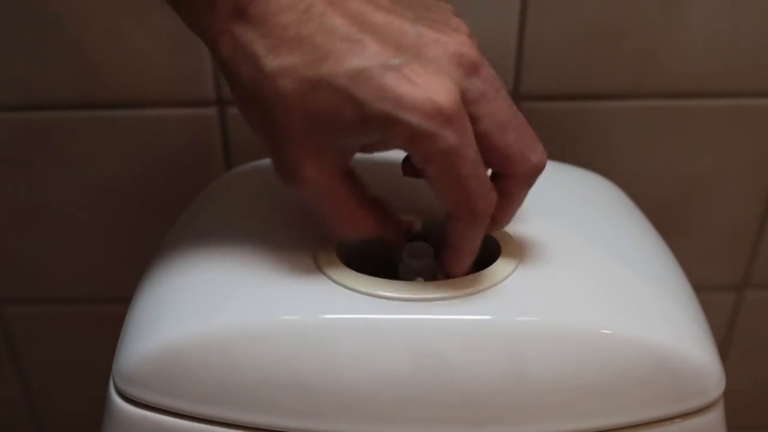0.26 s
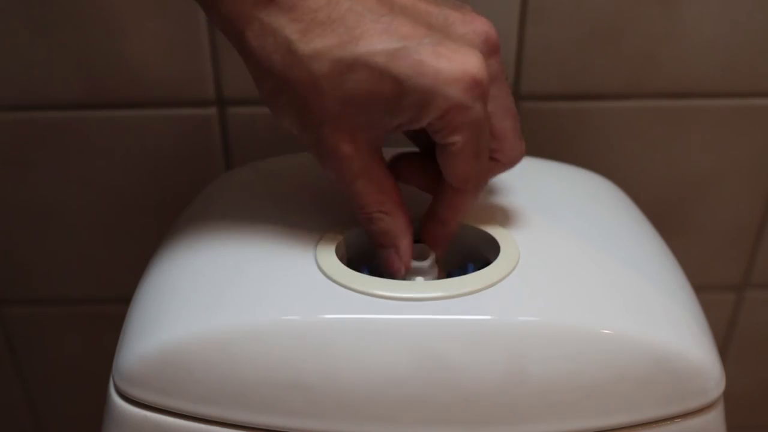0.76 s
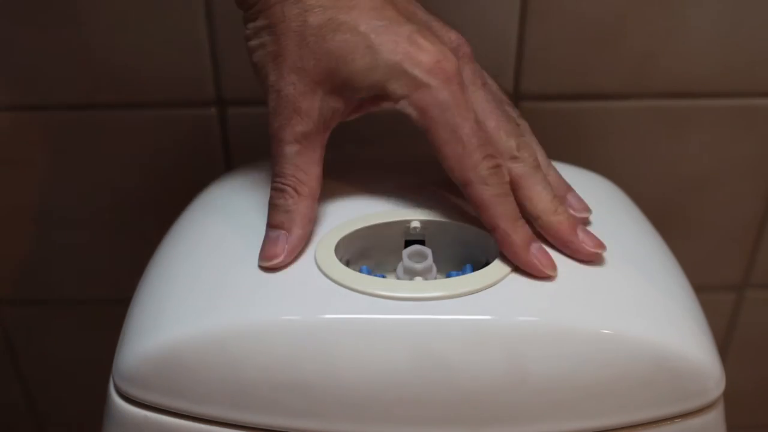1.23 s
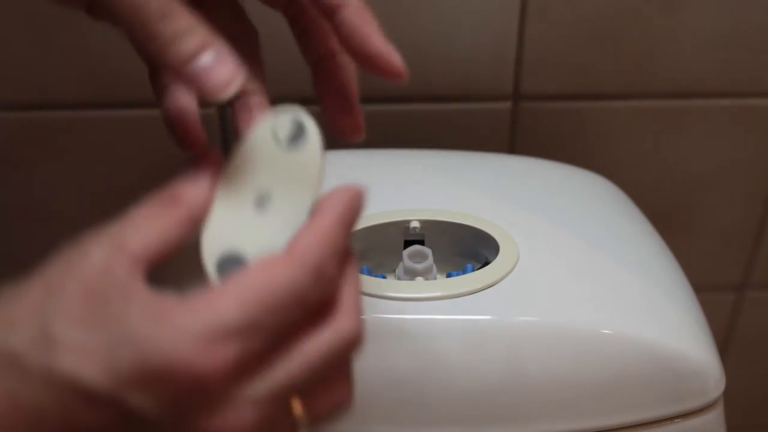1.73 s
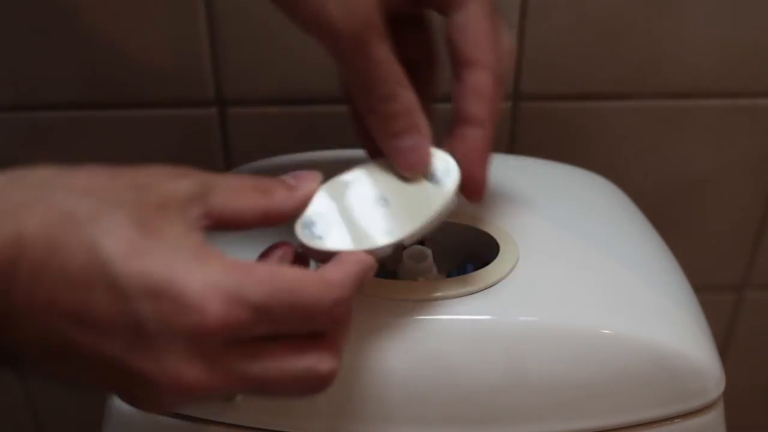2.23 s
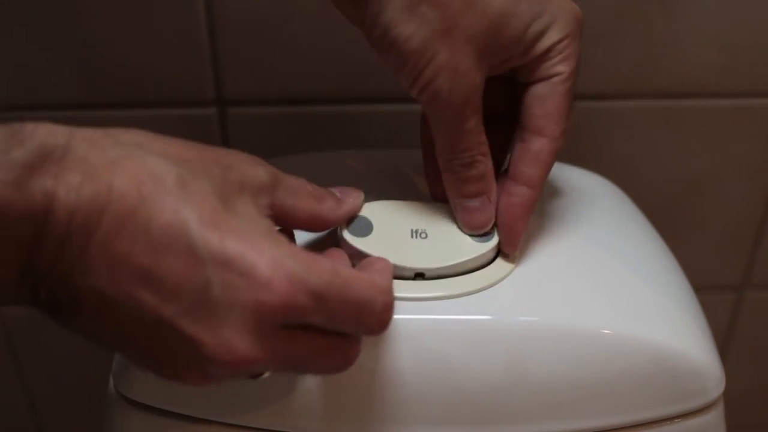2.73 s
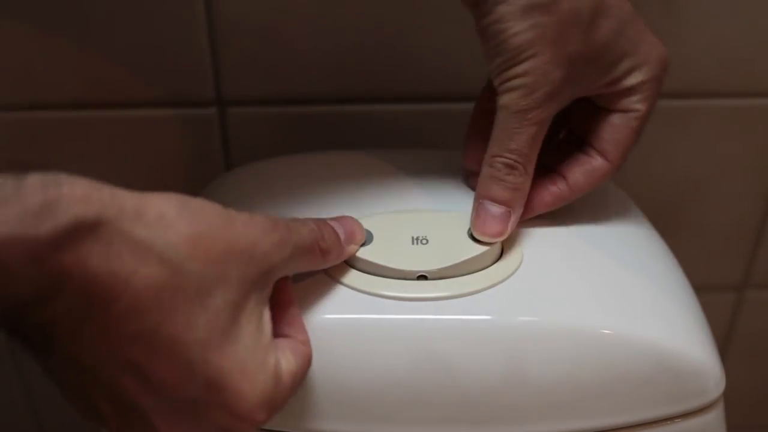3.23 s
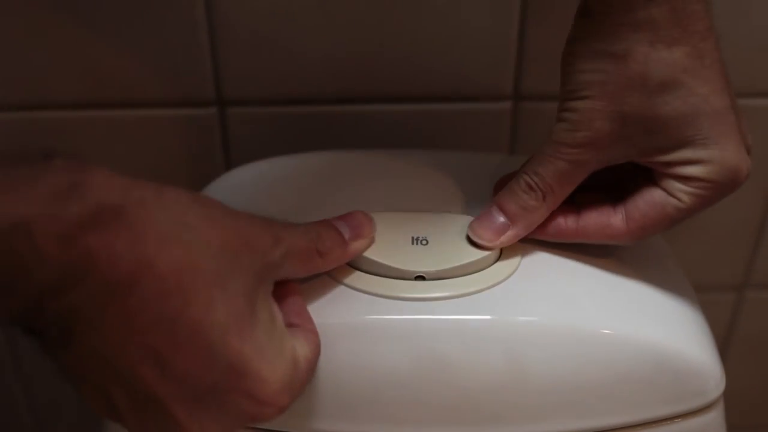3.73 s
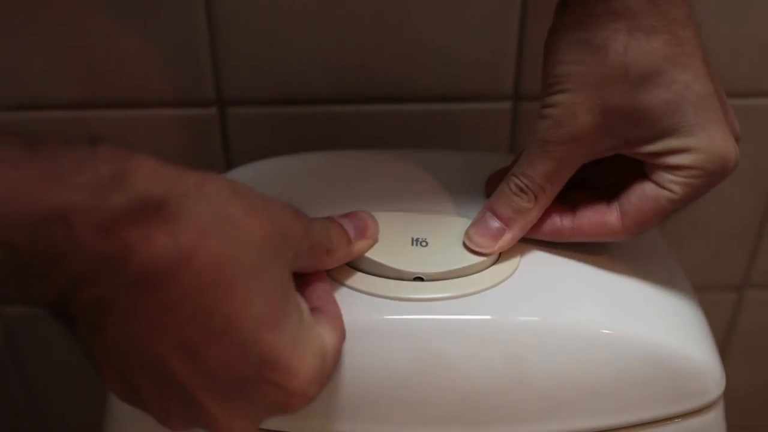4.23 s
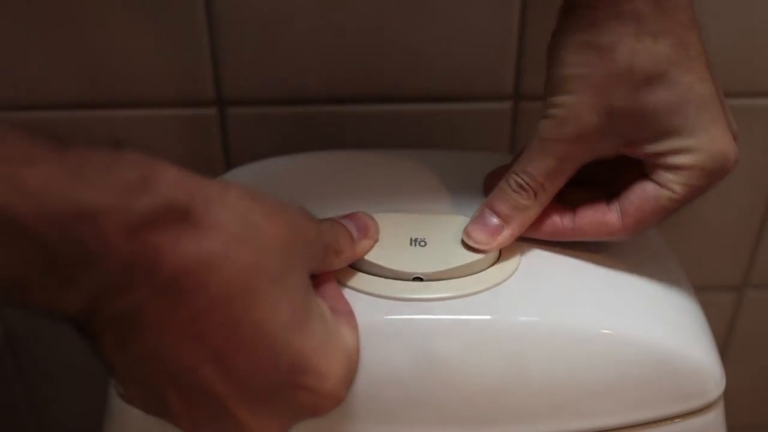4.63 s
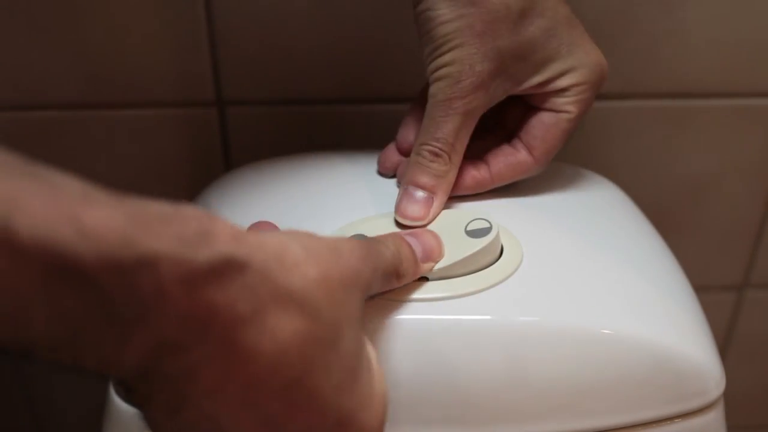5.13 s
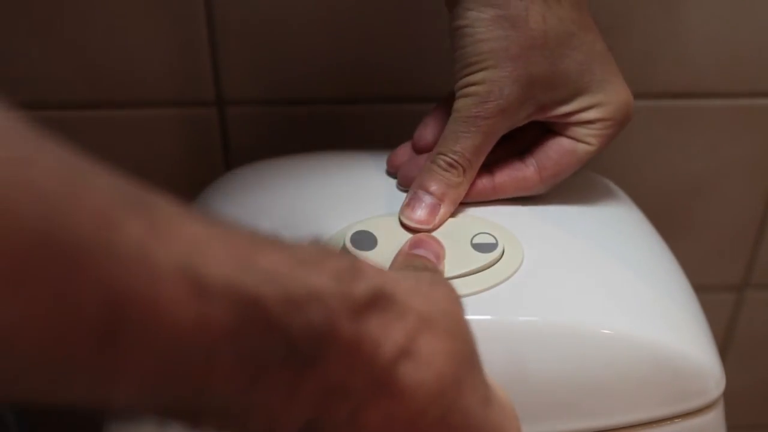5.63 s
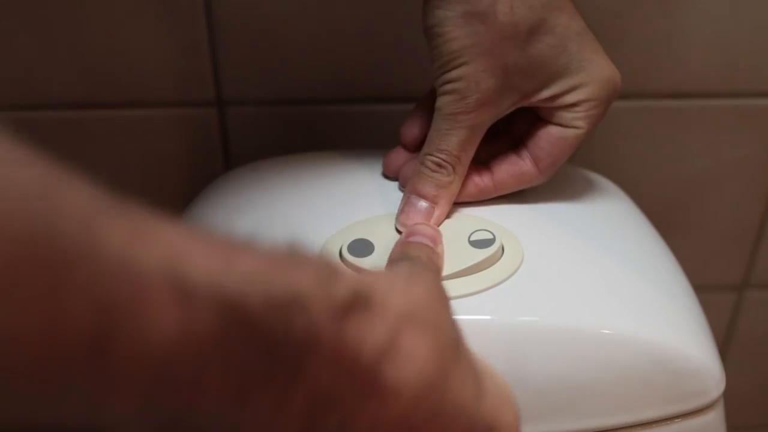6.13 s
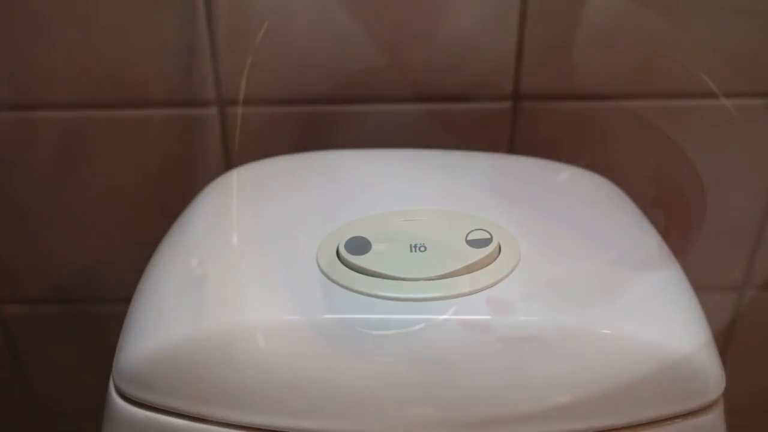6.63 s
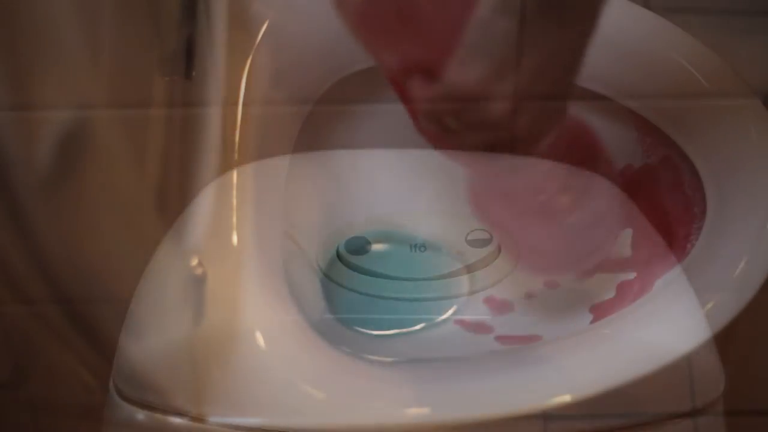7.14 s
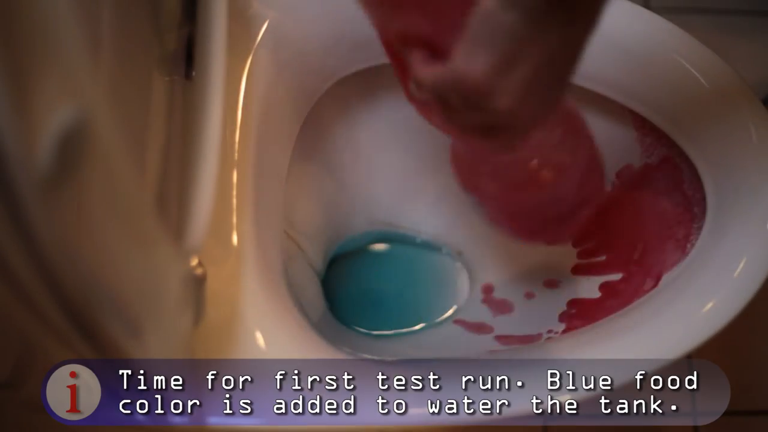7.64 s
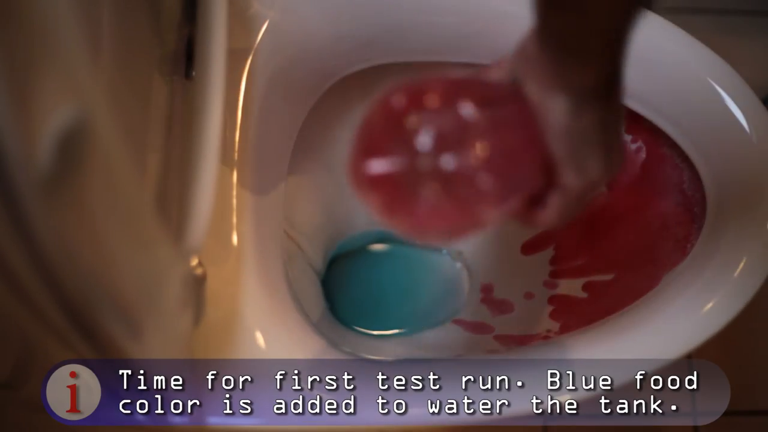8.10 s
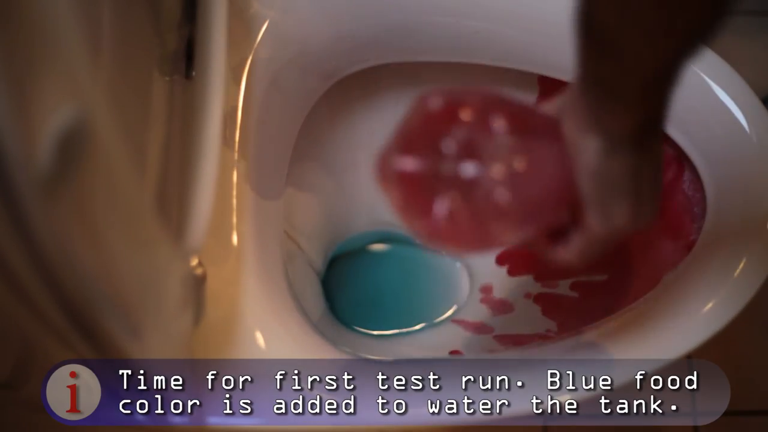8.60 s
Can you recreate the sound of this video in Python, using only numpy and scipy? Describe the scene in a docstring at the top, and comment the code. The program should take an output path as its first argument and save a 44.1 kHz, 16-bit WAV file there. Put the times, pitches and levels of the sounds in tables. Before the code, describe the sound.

A small plastic nut scrapes and slips on its thread over faint valve hiss, then a push button snaps in with two very loud clicks.

```python
"""A small plastic nut slips and scrapes on its thread inside a cistern lid, over a faint valve hiss, bright at first.
Fingers tick on plastic, a push button is set into the opening and its two catches snap home, loud enough
to clip the microphone; at the end a bottle knocks on the bowl. Hiss is noise through pipe resonances; ticks,
slips and knocks are short noise bursts ringing damped modes; snaps are coloured cracks with a ringing lid.
A small tiled bathroom answers every contact with a decaying noise tail."""
import sys
import numpy as np
from scipy import signal
from scipy.io import wavfile
from scipy.ndimage import uniform_filter1d

SR = 44100
rng = np.random.default_rng(int(sys.argv[2]) if len(sys.argv) > 2 else 0)


def ratio_of_db(decibels):
    """Turn decibels (scalar or array-like) into linear amplitude factors; 0 dB maps to 1."""
    return 10 ** (np.asarray(decibels, float) / 20)


def output_pcm(signal):
    """Save a mono or channel-first signal as 16-bit PCM at the path in sys.argv[1].

    Samples are clipped to [-1, 1] before scaling.
    """
    pcm = np.clip(np.atleast_2d(signal).T, -1, 1) * 32767
    wavfile.write(sys.argv[1], SR, np.round(pcm).astype(np.int16))


N = 390983  # samples
CONTACT_MS = 0.03  # a knock is one brief contact


def peaked(x):
    """Scales a sound to a peak of 1."""
    return x / abs(x).max()


def read(points, hz):
    """Reads a (frequency, value) table along a logarithmic frequency axis."""
    f, value = np.transpose(points)
    return np.interp(np.log(hz + 1), np.log(f + 1), value)


def add(mix, s, sound):
    """Lays a sound into the mix at s seconds."""
    part = mix[round(s * SR):][:len(sound)]
    part += sound[:len(part)]


def band(x, low_hz, high_hz):
    """Keeps what lies between two frequencies."""
    edges_hz = [low_hz, min(high_hz, SR / 2.1)]
    return signal.sosfilt(signal.butter(3, edges_hz, "band", fs=SR, output="sos"), x)


def without_top_treble(x):
    """Steep low-pass near 13 kHz: next to nothing remains in the top treble."""
    return signal.sosfilt(signal.ellip(8, 1, 70, 13000, fs=SR, output="sos"), x)


def ring(hz, db, t60):
    """One mode, a sine dying by 60 dB in t60 seconds, cut at a quarter second."""
    t = np.arange(SR // 4) / SR
    return ratio_of_db(db - 60 * t / t60) * np.sin(2 * np.pi * hz * t)


def ringing(modes):
    """All modes of one body sounding together."""
    return sum(ring(*mode) for mode in modes)


def tilted(modes, db_per_octave):
    """Harder contacts favour the upper modes, softer ones the lower."""
    middle = np.mean([np.log2(hz) for hz, db, t60 in modes])
    return [(hz, db + db_per_octave * (np.log2(hz) - middle), t60) for hz, db, t60 in modes]


def rattle(ms):
    """A contact is a short, dense noise burst that starts at once and dies fast."""
    t = np.arange(SR // 40) / SR
    decay = np.exp(-(1000 * t / ms) ** 1.1)
    return peaked(rng.standard_normal(len(t)) * decay)


def struck(modes, ms, crack_db, low_hz, high_hz):
    """The burst rings the modes and is also heard directly as a crack."""
    burst = rattle(ms)
    sound = peaked(signal.fftconvolve(burst, ringing(modes)))
    crack = peaked(band(burst, low_hz, high_hz))
    add(sound, 0, ratio_of_db(crack_db) * crack)
    return sound


def room(x, wet_db):
    """Dense reflections off the tiles, each band dying at its own speed."""
    # decay off the tiles: (frequency [Hz], t60 [s])
    tiles = [(100, 0.48), (260, 0.11), (700, 0.23), (1840, 0.22), (4850, 0.23), (12800, 0.14)]
    # slower second tail: (frequency [Hz], starting level [dB])
    late = [(100, -23), (400, -19.5), (900, -14), (2000, -22.5), (6000, -33), (12000, -26.5)]
    late_t60 = 0.53  # s
    taps = rng.standard_normal(SR)
    hz, t, z = signal.stft(taps, SR, nperseg=256)
    decay = ratio_of_db(-60 * t / read(tiles, hz)[:, None])
    # the hollow cistern and the hall beyond linger
    decay += ratio_of_db(read(late, hz)[:, None] - 60 * t / late_t60)
    tail = signal.istft(z * decay, SR, nperseg=256)[1]
    tail *= np.clip(np.arange(len(tail)) / SR / 0.0002, 0, 1)  # swells in over 0.2 ms
    return x + ratio_of_db(wet_db) * signal.oaconvolve(x, tail / np.linalg.norm(tail))[:N]


def hiss():
    """Valve in the cistern: steady noise through pipe resonances, with faint drifting patches."""
    # bright at first, opening uncovered, opening covered, at the bowl: (start [s], fade-in [s], top [Hz])
    parts = [(-1, .001, 15300), (1.456, .002, 13600), (2.5, .25, 13600), (6.96, .003, 13600)]
    # relative noise spectrum of each part: (frequency [Hz], density [dB per Hz])
    spectra = [
        [(24, -69), (40, -40), (273, -17), (359, -9), (496, -17), (548, -6.5), (926, -14.5), (2110, -9),
         (2270, -15), (3140, -7), (3380, -15), (3930, -3.5), (4800, -8.5), (8100, -4.5), (15500, -4)],
        [(12, -64), (20, -35), (193, -3), (275, -4.5), (315, -16), (361, -8), (714, -8.5), (796, -10.5),
         (1340, -5.5), (1710, -7.5), (2500, -7), (6330, -4), (13600, -24.5)],
        [(12, -57), (20, -33.5), (143, -2.5), (414, -4), (658, -1), (754, -4.5), (1370, -2.5), (1620, -4.5),
         (2790, -1.5), (4090, -5.5), (6330, -1), (9280, -5), (13600, -25.5)],
        [(12, -58), (20, -48), (112, -12.5), (253, -14), (324, -15), (437, -12.5), (623, -7.5), (888, -13),
         (1170, -7.5), (2870, -8.5), (4320, -10), (7670, -9.5), (13600, -34)],
    ]
    # pipe resonances of each part, negative ones dips: (frequency [Hz], width [Hz], height [dB])
    pipes = [
        [(546, 18, 10), (790, 28, 5), (2160, 18, 15), (3264, 40, 13), (3973, 42, 12), (4340, 500, -3.5),
         (6360, 320, -11), (7060, 45, 12), (7760, 40, 6), (8235, 60, 8), (10000, 35, 8), (11000, 100, -2),
         (12450, 65, 10), (14300, 52, 6)],
        [(1087, 19, 9.7), (1325, 53, 12.4), (2000, 20, 12), (2463, 20, 16), (2930, 220, 8.5), (3210, 39, 12),
         (4160, 36, 10.6), (4800, 50, 7.7), (6050, 68, 1.9), (6370, 81, 6), (7400, 280, 6.6), (9060, 2900, 6.1)],
        [(120.3, 15, 7.2), (1398, 80, 5.6), (1918, 42, 6.8), (2364, 31, 5.2), (2745, 50, 6.6), (2995, 30, 6.1),
         (3146, 46.7, 8.2), (3390, 31, 10.5), (4560, 240, 4.4), (5930, 60, 2.5), (6770, 68, 0.93)],
        [(295, 13.5, 17), (675, 20, 5.3), (760, 55, 9.8), (1126, 11, 15), (1955, 27, 9.4), (2420, 16, 1.9),
         (2840, 59, 7.9), (3000, 17, 3.7), (3280, 26, 6.9), (3750, 10, 1.7)],
    ]
    # higher while the opening is uncovered: (time [s], level [dB])
    levels = [(0, -47.5), (1.45, -47.5), (1.46, -46), (2.4, -45.5), (2.7, -49), (5.3, -49.5), (5.7, -51.5),
              (6.3, -49), (8.87, -50)]
    frames = N // 1024 + 5
    hz, t = np.fft.rfftfreq(4096, 1 / SR), np.arange(N) / SR
    out = np.zeros(N)
    for (start, fade, top_hz), spectrum, resonances in zip(parts, spectra, pipes):
        real, imaginary, patches = rng.standard_normal((frames, 2049, 3)).T
        patches = uniform_filter1d(uniform_filter1d(patches, 30, 0), 4, 1)
        patches_db = 1.63 * patches / patches.std()
        db = read(spectrum, hz)
        db = db + sum(height / (1 + (2 * (hz - f) / width) ** 2) for f, width, height in resonances)
        db -= 60 * (hz > top_hz)
        bins = (real + 1j * imaginary) * ratio_of_db(db[:, None] + patches_db)
        noise = signal.istft(bins, nperseg=4096, noverlap=3072)[1][:N]
        # each part fades in over the one before at equal power
        angle = np.pi / 2 * np.clip((t - start) / fade, 0, 1)
        out = np.cos(angle) * out + np.sin(angle) * noise / noise.std()
    return out * ratio_of_db(np.interp(t, *np.transpose(levels)))


def rubbing():
    """Thumbs rub on the button: dense soft grains in a narrow treble band."""
    # (start [s], length [s], loudest grain level [dB])
    rubs = [(3.15, 0.38, -41.5), (4.68, .3, -45.5), (5.03, 0.22, -42.5), (6.5, 0.44, -45)]
    grains_per_s = 150
    out = np.zeros(N)
    for start, length, db in rubs:
        for s, softness, pitch in rng.random((int(length * grains_per_s), 3)):
            mode = (5700 + 700 * pitch, 0, 0.012)
            grain = struck([mode], 4.1, -8.5, 5400, 9000)
            add(out, start + length * s, ratio_of_db(db - 11 * softness) * grain)
    return without_top_treble(room(out, -7))


def hands():
    """Hands land on the porcelain, each thump four damped modes; a palm slides off as a noise burst."""
    # (time [s], level [dB], lowest mode [Hz], its t60 [s], crack level [dB])
    thumps = [(1.317, -37, 490, 0.033, -22), (1.329, -34.5, 560, 0.022, -9), (2.766, -39, 276, 0.037, -25),
              (2.799, -42, 211, 0.045, -25), (6.386, -45.5, 288, .3, -26), (6.39, -52, 91, 0.18, -25),
              (6.70, -55, 463, 0.25, -20)]
    # the palm slides off the lid: (time [s], level [dB], decay time [ms])
    scrape_s, scrape_db, scrape_ms = 1.329, -33, 12
    out = np.zeros(N)
    for s, db, hz, t60, crack_db in thumps:
        modes = [(hz, 0, t60), (hz * 1.084, -3, t60 * 0.43),
                 (hz * 1.44, -6, t60 * 0.4), (hz * 2.04, -9, t60 * 0.48)]
        thump = struck(modes, CONTACT_MS, crack_db, 930, 7500)
        add(out, s, ratio_of_db(db) * peaked(band(thump, hz * 0.7, 12000)))
    add(out, scrape_s, ratio_of_db(scrape_db) * peaked(band(rattle(scrape_ms), 1100, 10300)))
    return without_top_treble(room(out, -1.6))


def bottle():
    """A soft bottle bumps the bowl; its hard cap clacks, skids and bounces, each on its own modes."""
    # bottle on the bowl: (time [s], level [dB], tilt [dB per octave])
    bumps = [(6.964, -30.5, 5), (7.401, -33, -6), (8.169, -44, -11.5)]
    # modes of the bottle: (frequency [Hz], level [dB], t60 [s])
    body = [(125, -7, 0.042), (165, -2.5, 0.062), (225.7, -1.5, 0.098), (303, -4, 0.2), (445, 0, 0.038),
            (613, -5, 0.044), (790, -21, .04)]
    # cap on the bowl, then its bounce: (time [s], level [dB])
    clacks = [(7.5139, -18), (7.537, -34)]
    # modes of the cap: (frequency [Hz], level [dB], t60 [s])
    cap = [(620, -17, 0.018), (860, -9, 0.021), (1230, -12, .018), (1540, -5, 0.018), (1831, 1, .05),
           (2330, -5, 0.015), (2900, -3, .012), (3600, -8, 0.0088)]
    out = np.zeros(N)
    for s, db, tilt_db in bumps:
        bump = struck(tilted(body, tilt_db), CONTACT_MS, -4.5, 930, 5400)
        add(out, s, ratio_of_db(db) * peaked(band(bump, 115, 12000)))
    for s, db in clacks:
        clack = struck(cap, CONTACT_MS, -6, 3400, 8200)
        add(out, s, ratio_of_db(db) * peaked(band(clack, 440, 13000)))
        skid = peaked(band(rattle(4), 950, 4400))  # the cap skids as it lands
        add(out, s, ratio_of_db(db - 5.5) * skid)
    return without_top_treble(room(out, -1.6))


def seating():
    """The button's edge meets the rim and rings the button's damped modes."""
    # (time [s], level [dB], tilt [dB per octave])
    seatings = [(2.662, -24, -1), (2.748, -18, 0.5)]
    # modes of the button: (frequency [Hz], level [dB], t60 [s])
    button = [(264, -11, .03), (1094, -8.5, 0.029), (2050, -9.5, 0.052), (2360, -4.5, .02),
              (3200, 0, 0.0078), (3800, -4, 0.0075)]
    out = np.zeros(N)
    for s, db, tilt_db in seatings:
        knock = struck(tilted(button, tilt_db), CONTACT_MS, -6.5, 930, 8600)
        add(out, s, ratio_of_db(db) * peaked(band(knock, 150, 12000)))
    return without_top_treble(room(out, -1.6))


def ticks():
    """Plastic under the fingers: two close short modes per clear tick, one per faint random tick."""
    # the clearest ticks: (time [s], level [dB], lower mode [Hz])
    clear = [(1.59, -34.5, 5730), (1.6417, -35.5, 5000), (1.682, -22.5, 5770), (1.9994, -35, 6380),
             (2.2812, -36, 6360), (2.4814, -37, 6900), (2.6614, -25, 6370), (2.7468, -26, 5900),
             (3.242, -33.5, 5780), (3.3743, -37, 6540), (3.553, -32, 5860), (3.9142, -31.5, 5780),
             (4.6964, -31, 8040), (5.135, -35, 6420), (5.621, -34, 8880), (6.2292, -35, 6020),
             (6.558, -37, 5700), (6.579, -30.5, 6400), (6.691, -33.5, 6370), (6.8056, -31, 6580)]
    # one thin broad tick: (time [s], level [dB])
    crackle_s, crackle_db = 7.3123, -34
    out = np.zeros(N)
    for s, db, hz in clear:
        pair = [(hz, 0, 0.012), (hz + 550, -3, 0.007)]
        add(out, s, ratio_of_db(db) * struck(pair, 4.65, -11.5, 4670, 8300))
    add(out, crackle_s, ratio_of_db(crackle_db) * peaked(band(rattle(3.55), 4500, 9600)))
    start_s, span_s = 1.5, 5.4  # while the hands work
    for s, size, pitch in rng.random((340, 3)):
        mode = (5600 + 2600 * pitch ** 2, 0, 0.008)
        faint = struck([mode], 2.4, -3.5, 4900, 11000)
        add(out, start_s + span_s * s, ratio_of_db(-47.5 + 10 * size ** 2) * faint)
    return without_top_treble(band(room(out, -6), 2500, 19000))


def nut():
    """The nut slips on its thread, each slip ringing its modes, among fine random scrapes."""
    # (time [s], level [dB], broad crack [dB], middle modes [dB], burst decay time [ms])
    slips = [(0.0591, -30, -10, -9, 4.5), (0.0813, -24.5, -6, 0, 4.2), (0.1158, -28.5, -22, -7, 3.7),
             (0.183, -26.5, -17, -7, 4.9), (0.2273, -28, -14, -3, 8.1), (0.286, -26.5, -7, 0.5, 10),
             (0.4035, -31, -18, -7, 2.3), (0.4727, -23, 2, 0.5, 3.5), (0.5091, -24, -13, 1, 10),
             (0.564, -23, -2, -1, 2.3), (0.636, -23, 3, 14, 4.2), (0.6633, -30.5, -15, 1, 6),
             (0.7442, -35, -6, 1, 2.6), (0.791, -23, 1, 6, 2.7), (0.8869, -32, -8, 4.5, 4)]
    # modes of the nut: (frequency [Hz], level [dB], t60 [s])
    nut_modes = [(558.5, -0.5, 0.062), (337, -16, 0.015), (3370, -17, 0.018), (4580, 3, 0.0024),
                 (9086, 2.5, 0.015), (9600, -23, .008), (14500, -0.5, 0.012)]
    hollow_db, thin_db = -21, -7.5  # share of the two low modes and of the top mode in every slip
    out = np.zeros(N)
    for s, db, crack_db, mid_db, ms in slips:
        shares_db = [hollow_db, hollow_db, mid_db, mid_db, 0, 0, thin_db]
        modes = [(hz * rng.uniform(0.98, 1.02), d + share, t60)
                 for (hz, d, t60), share in zip(nut_modes, shares_db)]
        add(out, s, ratio_of_db(db) * struck(modes, ms, crack_db, 3230, 13000))
    scrape_modes = [(hz, d - 12 * (hz < 1000), t60) for hz, d, t60 in nut_modes] + [(770, -1.5, 0.014)]
    scrape_span_s = 0.95
    for s, size in rng.random((110, 2)):
        scrape = struck(scrape_modes, 6.6, -2, 1130, 15000)
        add(out, scrape_span_s * s, ratio_of_db(-49.5 + 9.8 * size) * scrape)
    # deep in the opening, little reaches the tiles; two passes steepen the band edges
    return band(band(room(out, -8), 220, 17000), 220, 17000)


def crack_colour(spectrum):
    """Minimum-phase impulse with the given spectrum, so the crack starts at once."""
    hz = np.fft.rfftfreq(4096, 1 / SR)
    gain = np.log(ratio_of_db(np.maximum(read(spectrum, hz), -90)))
    full = np.r_[gain, gain[-2:0:-1]]
    return np.fft.ifft(np.exp(full - 1j * signal.hilbert(full).imag)).real


def snaps():
    """Each catch gives one hard blow that cracks broadly and rings the lid and hollow cistern."""
    # the two catches: (time [s], crack level [dB], lid ring level [dB])
    catches = [(5.42, 6.989, -35), (5.8174, 8.487, -15.5)]
    # relative crack spectrum of each catch: (frequency [Hz], density [dB per Hz])
    colours = [
        [(18, -63), (30, -35), (546, 0), (787, -10.5), (874, -14.5), (1290, -13.5), (2130, -10.5), (3060, -7),
         (3310, -9), (6050, -6.5), (9680, -10.5), (15500, -45.5)],
        [(18, -79), (30, -42.5), (560, -6.5), (1330, -17), (1470, -23.5), (1860, -18.5), (2130, -23.5),
         (2620, -16.5), (3490, -18.5), (4080, -14), (7450, -10.5), (15500, -34.5)],
    ]
    # porcelain lid and button, damped by the pressing thumbs: (frequency [Hz], level [dB], t60 [s])
    lid = [(273, -13, 0.022), (470, -17, 0.068), (520, -20, 0.057), (560, -7.5, 0.049), (652, 10.5, 0.1),
           (763, 2.5, 0.038), (1020, -17, 0.0378), (1398, 9.5, 0.025), (2000, 6.5, 0.033), (3180, 12, .04),
           (4120, 6, 0.026), (4420, 9, .04), (5440, -1.5, 0.033), (5780, 6, .04), (7190, -5.5, .03)]
    # thin lasting ring of the button: (frequency [Hz], level [dB], t60 [s])
    sheen = [(4200, -7, .2), (4800, -4, .2), (5430, 4, .24), (5635, -2, 0.3), (5850, -0.5, .24)]
    # hollow porcelain heard directly: (frequency [Hz], level [dB], t60 [s])
    cistern = [(282, -12, 0.18), (467, -12, 0.048), (487, -7.5, 0.16), (562, 8.5, .11), (656, -4, .16),
               (730, -12.5, 0.083)]
    hollow = ringing(cistern)
    hollow *= 1 - np.exp(-np.arange(len(hollow)) / SR / 0.013)  # the hollow takes a moment to speak
    out = np.zeros(N)
    for (s, db, lid_db), spectrum in zip(catches, colours):
        colour = crack_colour(spectrum)
        blow, direct = np.zeros((2, N))
        add(blow, s, ratio_of_db(db) * colour / np.linalg.norm(colour))
        add(blow, s, ratio_of_db(lid_db) * peaked(ringing(lid)))
        chatter = peaked(signal.fftconvolve(rattle(4.9), colour))  # the catch chatters as it seats
        add(direct, s, ratio_of_db(db + 3.5) * chatter)
        add(direct, s, ratio_of_db(db - 24) * ring(40, 0, 0.028))  # the jolt nudges the microphone
        add(direct, s, ratio_of_db(lid_db + 9) * peaked(ringing(sheen)))
        add(direct, s, ratio_of_db(db - 16.5) * peaked(hollow))
        out += room(blow, 16.85) + direct
    return out


def scene():
    """All sources at one microphone."""
    return (hiss() + rubbing() + hands() + bottle() + seating() + ticks() + nut() + snaps())[None]


def low_pass(x):
    """Removes everything above the highest recorded frequency."""
    return signal.sosfilt(signal.butter(12, 15640, fs=SR, output="sos"), x)


def record(dry):
    """The snaps overload the microphone input and clip flat."""
    clipped = np.clip(dry, -1, 1)
    return low_pass(clipped)


dry = scene()
out = record(dry)
output_pcm(out)
```